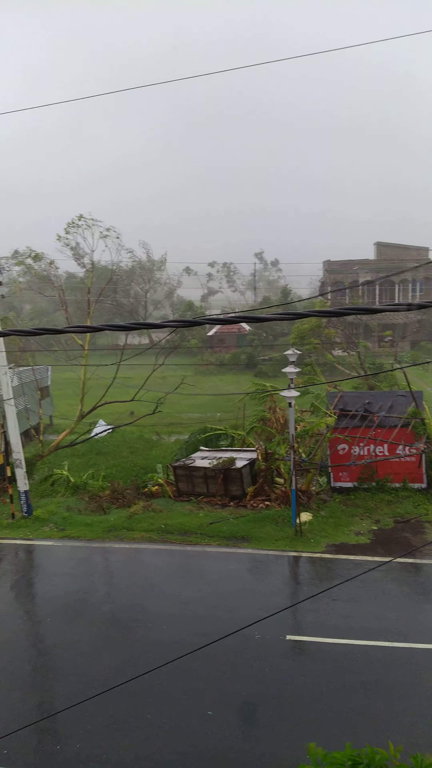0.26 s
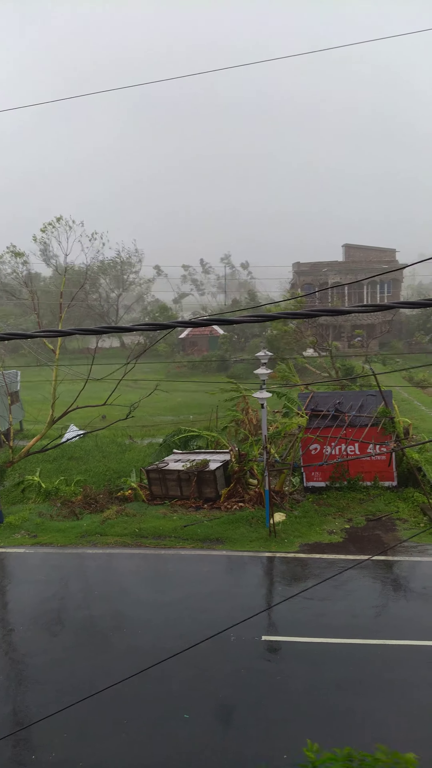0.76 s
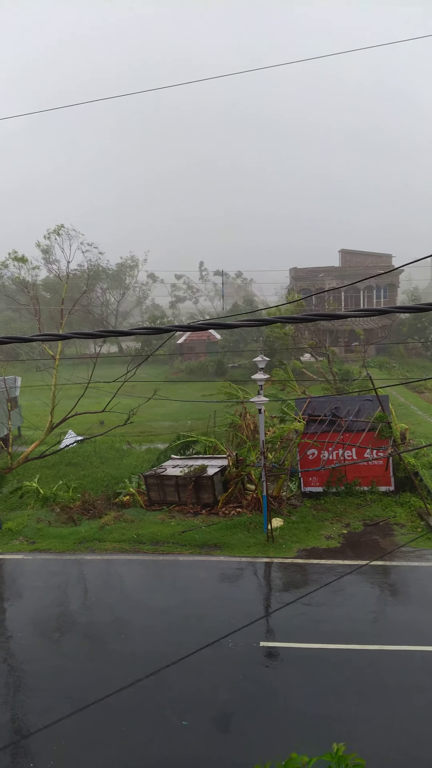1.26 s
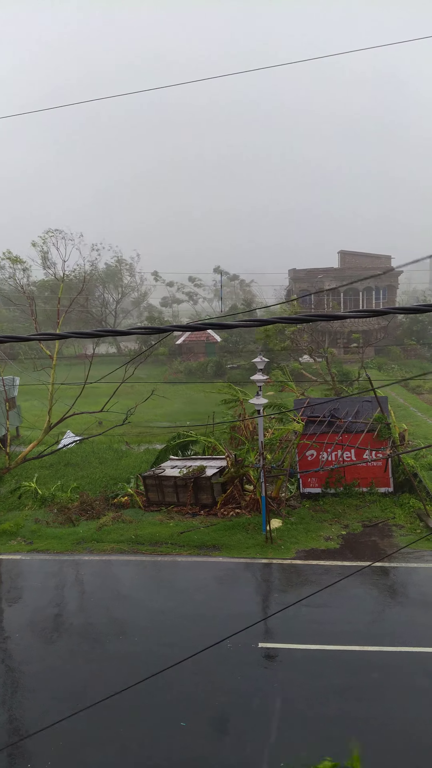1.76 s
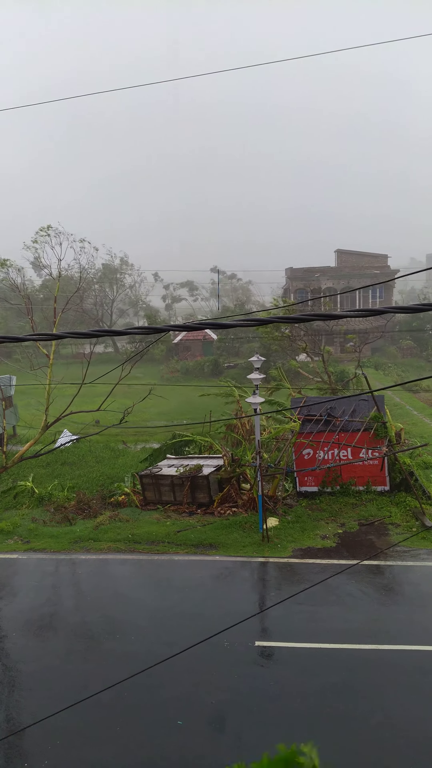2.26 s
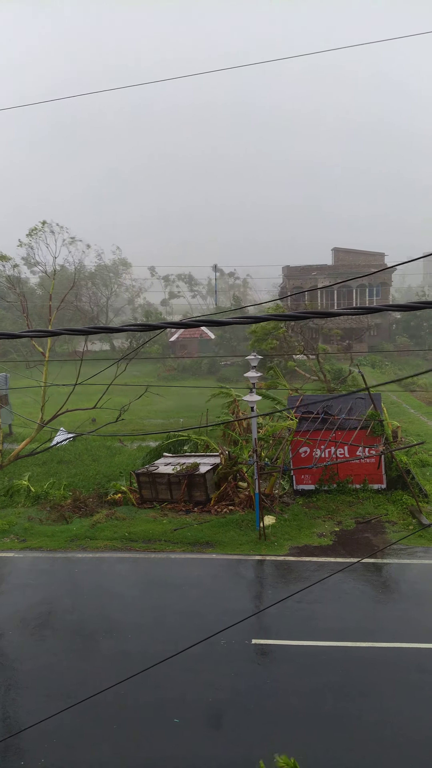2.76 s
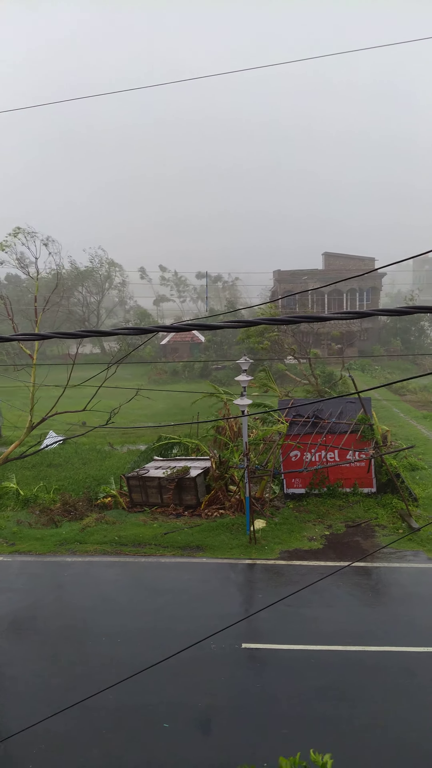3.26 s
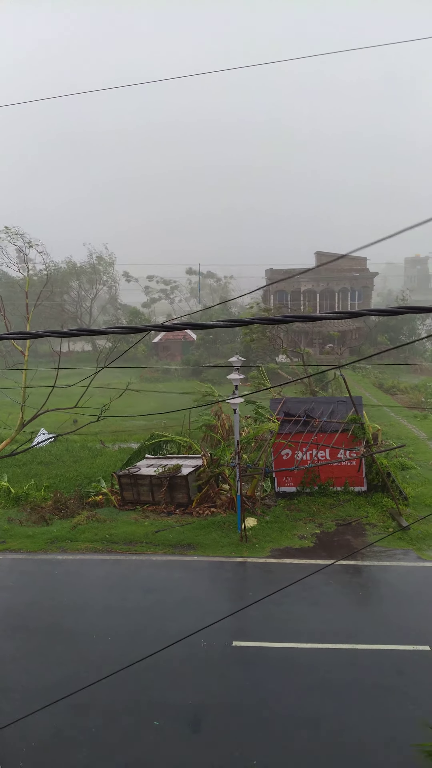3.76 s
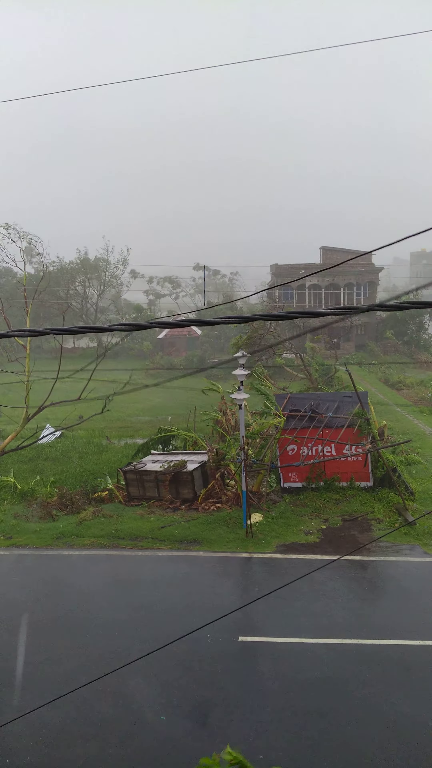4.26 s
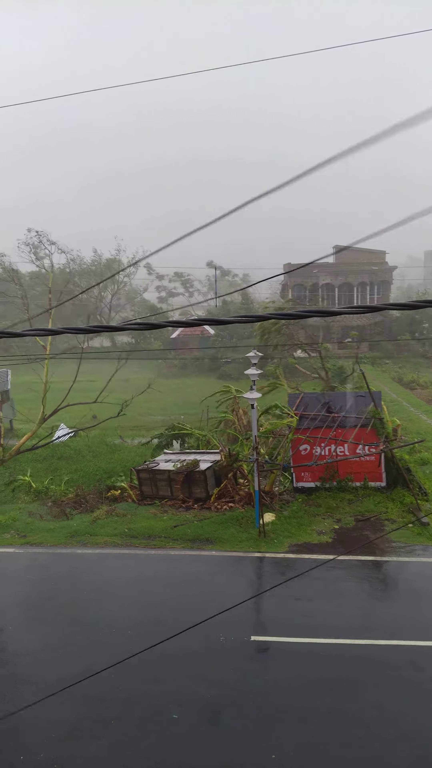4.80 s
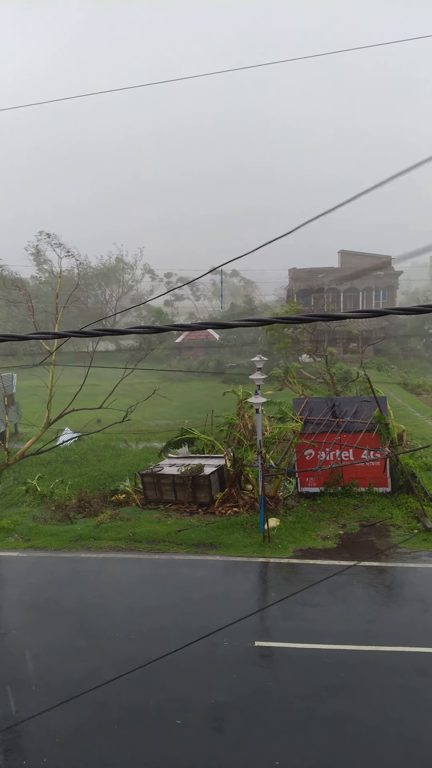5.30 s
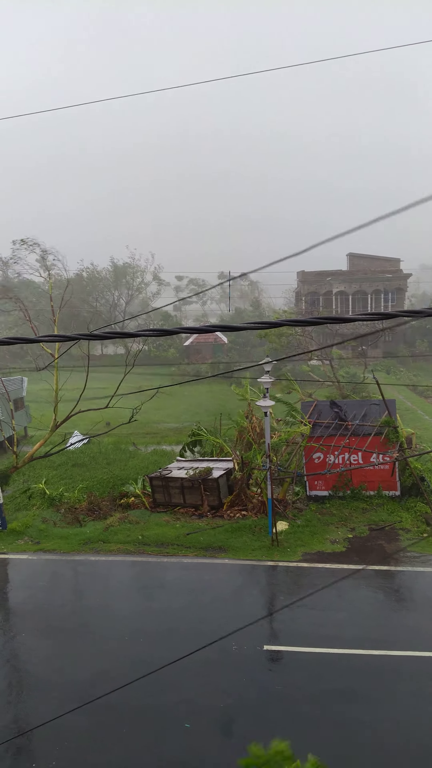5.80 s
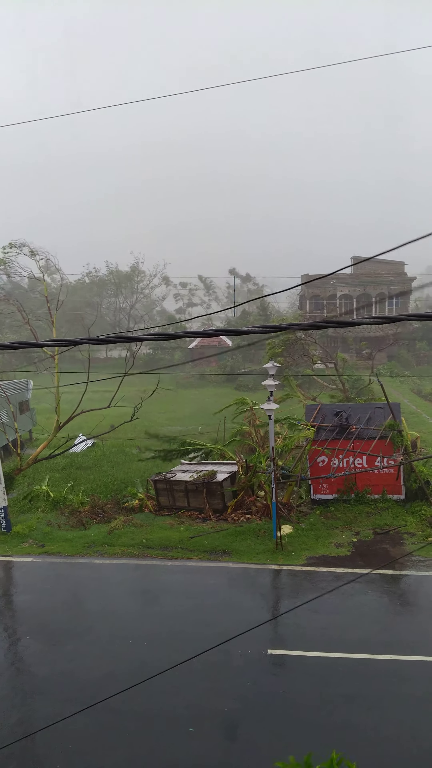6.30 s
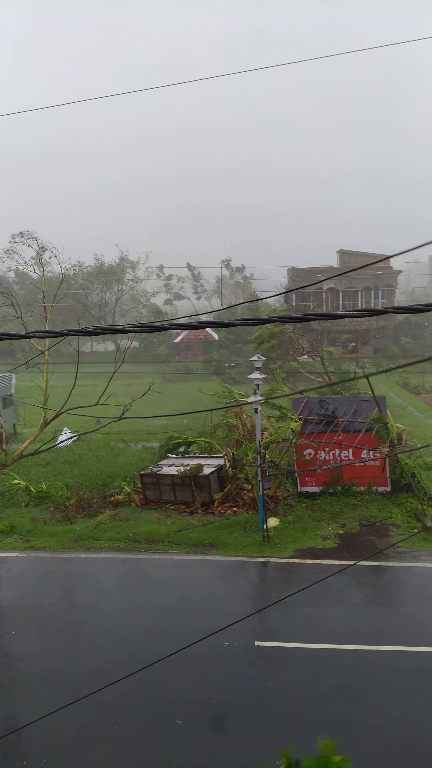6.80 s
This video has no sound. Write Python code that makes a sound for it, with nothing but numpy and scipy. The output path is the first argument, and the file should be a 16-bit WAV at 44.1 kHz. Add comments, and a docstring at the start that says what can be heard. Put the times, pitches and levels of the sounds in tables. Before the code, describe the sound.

Strong storm wind buffets the microphone in two long, crackling gusts, with distant trees roaring and faint rain in the lull between.

```python
"""Cyclone gusts buffet one small microphone, out by a wet road and fields.
Two long gusts hit the port: faster air is brighter, crackles, and makes the gain control duck the storm.
In the lull single eddies thump on the port and a squall flings spray into the leaves.
Far off, one storm strength drives the roar of the trees and the hiss of the rain.
Wires moan overhead, and near the end a loose panel knocks twice."""
import sys
import numpy as np
from scipy import signal
from scipy.fft import rfft, irfft, next_fast_len
from scipy.io import wavfile
from scipy.ndimage import uniform_filter1d, minimum_filter1d, map_coordinates

SR = 44100
rng = np.random.default_rng(int(sys.argv[2]) if len(sys.argv) > 2 else 0)


def to_wav(s):
    """Save 16-bit WAV."""
    ch = np.atleast_2d(s).T  # columns
    pcm = np.round(np.clip(ch, -1, 1) * 32767)  # PCM
    wavfile.write(sys.argv[1], SR, pcm.astype(np.int16))


N = 310904
TIME_S = np.arange(N) / SR


def amp(db):
    """Decibels to gain."""
    return 10 ** (np.asarray(db) / 20)


def unit(x):
    """x at rms 1."""
    return x / np.sqrt(np.mean(x ** 2) + 1e-20)


def curve(rows):
    """(time_s, value) points joined into one value per sample."""
    return np.interp(TIME_S, *np.transpose(rows))


def wobble(knots_per_s):
    """A smooth random curve."""
    knots = rng.standard_normal(int(N * knots_per_s / SR) + 4)
    return map_coordinates(knots, [TIME_S * knots_per_s])


def filtered(x, response):
    """x times a response of frequency."""
    size = next_fast_len(N + SR // 2)
    return irfft(rfft(x, size) * response(np.fft.rfftfreq(size, 1 / SR)), size)[:N]


def low_cut(hz, corner_hz):
    """Response that falls 12 dB an octave below the corner."""
    return hz ** 2 / np.hypot(hz ** 2, corner_hz ** 2)


def coloured(x, spectrum):
    """x shaped by (freq_hz, level_db) points, at rms 1."""
    freq_hz, level_db = np.transpose(spectrum)
    return unit(filtered(x, lambda hz: amp(np.interp(np.log(hz + 1), np.log(freq_hz), level_db))))


def rush(spectrum, patchy_db):
    """Noise of rms 1 with patches of random gain in time and frequency."""
    frames = signal.stft(rng.standard_normal(N), nperseg=512)[2]
    patches = uniform_filter1d(rng.standard_normal(frames.shape), size=5, axis=0)
    patches = unit(uniform_filter1d(patches, size=14, axis=1))
    noise = signal.istft(frames * amp(patchy_db * patches), nperseg=512)[1][:N]
    return coloured(noise, spectrum)


# Storm across the fields, relative to the lull: time_s, strength_db
STORM_STRENGTH = [(0, -0.5), (1.3, 1.5), (2.12, -4), (2.18, 2), (2.62, -2.2), (2.73, 2), (3.5, 0.5),
                  (3.72, 5.5), (4.1, 6.5), (5.35, 5), (5.65, 3), (6.02, 6), (6.3, 3), (6.68, -0.5),
                  (7.05, 3.5)]

def storm(squall_at_s=3.625, squall_db=8.5, rise_s=.012, fall_s=.048, flurry_db=.42):
    """Strength of the storm in dB: slow swells, small flurries and one sharp squall."""
    age = TIME_S - squall_at_s
    squall = np.exp(-.5 * (age / np.where(age < 0, rise_s, fall_s)) ** 2)
    return curve(STORM_STRENGTH) + squall_db * squall + flurry_db * wobble(20)


# Wind in the leaves, far off: freq_hz, level_db
LEAF_SPECTRUM = [(20, -44), (48, -29), (80, -2), (130, 2), (250, -0.5), (540, -1), (700, -3.5), (880, -3),
                 (1400, 1), (1850, -4), (2200, -3), (2650, -10.5), (3300, -9.5), (5000, -25), (12000, -41)]

def trees(storm_db, lull_db=-29.5, growth=.65, sway_db=.5):
    """Distant trees roar louder as the storm grows."""
    level_db = lull_db + growth * storm_db + sway_db * wobble(8.2)
    return amp(level_db) * rush(LEAF_SPECTRUM, patchy_db=1.2)


# Spray over the road and fields: freq_hz, level_db
SPRAY_SPECTRUM = [(2650, -9.5), (4500, -8), (4920, -12.5), (6320, -11), (7280, -5.5), (7710, -3),
                  (8340, -1), (8740, 2), (9260, -2), (11600, -18), (13200, -21.5), (15100, -19),
                  (15700, -24)]

def rain(storm_db, lull_db=-45.5, drops_per_s=900, drops_db=-8):
    """Driven spray hisses with the storm; drops nearer the microphone tick in it."""
    drops = (rng.random(N) < drops_per_s / SR) * rng.standard_normal(N)
    ticks = amp(drops_db) * coloured(drops, SPRAY_SPECTRUM)
    hiss = rush(SPRAY_SPECTRUM, patchy_db=.7)
    return amp(lull_db + storm_db) * (hiss + ticks)


# Swell of the wires overhead: time_s, level_db
WIRE_LEVELS = [(0, -48), (2.2, -43.5), (2.8, -38.5), (3.5, -46), (3.82, -34.5), (6.3, -40), (6.7, -36.5),
               (7.05, -31)]
# Their moan: freq_hz, level_db
MOAN_SPECTRUM = [(300, -41), (580, -18), (690, -0.5), (780, -3.5), (880, -28), (1600, -55), (5000, -100)]

def wires(waver_db=1.0):
    """The overhead wires shed a low, wavering moan."""
    return amp(curve(WIRE_LEVELS) + waver_db * wobble(15)) * rush(MOAN_SPECTRUM, patchy_db=.5)


# Knocks of a loose panel: start_s, level_db, t60_s
PANEL_KNOCKS = [(6.908, -24.5, .14), (6.994, -13.5, .035)]
# Its resonances: pitch_hz, width_hz, level_db
PANEL_MODES = [(720, 300, 0), (1080, 300, -5), (1860, 450, -7)]

def loose_panel(attack_s=.001, top_hz=2600):
    """Each knock rattles the panel briefly in a few broad resonances."""
    def body(hz):
        modes = 0
        for k, (pitch_hz, width_hz, level_db) in enumerate(PANEL_MODES):
            damping = 1j * hz * width_hz
            modes += (-1) ** k * amp(level_db) * damping / (pitch_hz ** 2 - hz ** 2 + damping)
        return modes / (1 + (hz / top_hz) ** 4)

    envelope = np.zeros(N)
    for start_s, level_db, t60_s in PANEL_KNOCKS:
        age = np.maximum(TIME_S - start_s, 0)
        envelope += amp(level_db - 60 * age / t60_s) * (1 - np.exp(-age / attack_s))
    return envelope * unit(filtered(rng.standard_normal(N), body))


def swirl(spectrum):
    """Noise of rms 1 whose pressure swings fairly evenly, as within one eddy."""
    analytic = signal.hilbert(rush(spectrum, patchy_db=7.0))
    return unit(analytic.real / (np.abs(analytic) + .6))


# Single eddies right on the microphone: centre_s, level_db, half_length_s
EDDY_HITS = [(0.234, 0, 0.001), (1.309, -14, 0.004), (2.173, -13, 0.0056), (2.194, -17.5, 0.0091),
             (2.243, -24, 0.011), (2.543, -22, 0.0087), (2.72, -25, 0.01), (3.574, -18.5, 0.015),
             (3.7, -11.5, 0.016), (3.761, -6, 0.017), (3.913, -15.5, 0.018), (4.02, -18.5, 0.022),
             (4.103, -16.5, 0.012), (4.226, -13, 0.011), (4.232, -3, 0.0012), (5.887, -7.5, .0014),
             (6.545, -28, 0.013)]
# Their thump: freq_hz, level_db
THUMP_SPECTRUM = [(20, -26), (50, -18), (85, 4), (130, 5.5), (200, -2.5), (320, -10), (600, -26),
                  (1200, -52), (4000, -69)]
# Slap of medium eddies, here and in the gusts: freq_hz, level_db
MEDIUM_EDDY_SPECTRUM = [(100, -18), (230, -9), (360, -0.5), (520, 1), (720, -0.5), (1000, -5), (1400, -14),
                        (2200, -34.5), (4000, -76), (9000, -93)]

def single_eddies(even_mix_s=.0032, slap_power=1.9):
    """Single eddies hit the port with a deep thump; shorter ones slap more."""
    thump, slap = swirl(THUMP_SPECTRUM), swirl(MEDIUM_EDDY_SPECTRUM)
    pressure = np.zeros(N)
    for centre_s, level_db, half_length_s in EDDY_HITS:
        brightness = (even_mix_s / half_length_s) ** slap_power
        envelope = amp(level_db) * np.exp(-.5 * ((TIME_S - centre_s) / half_length_s) ** 2)
        pressure += envelope * (thump + brightness * slap) / np.hypot(1, brightness)
    return filtered(pressure, lambda hz: low_cut(hz, corner_hz=60))


# Sharpest overloads at the microphone: time_s, relative_peak_db
OVERLOADS = [(0.3561, -29), (0.4803, -32), (0.5147, -27), (0.9193, -27), (4.6454, -24), (4.7446, -21),
             (4.7684, -28), (4.8189, -25), (4.9896, -24), (5.0284, -30), (5.1357, -31), (5.1654, -28),
             (5.1991, -21), (5.6994, -35)]
# One crack: freq_hz, level_db
CRACK_SPECTRUM = [(1000, -20), (2500, -2), (4500, 0), (7300, -10), (9000, -24), (15000, -38)]

def cracks(boost_db=12.0):
    """The hardest pressure jumps overload the port with single sharp cracks."""
    jumps = np.zeros(N)
    for time_s, relative_peak_db in OVERLOADS:
        jumps[int(time_s * SR)] += amp(relative_peak_db + boost_db)
    impulse = np.arange(N) == SR
    crack = coloured(impulse, CRACK_SPECTRUM)[SR - 256:SR + 257]
    return signal.fftconvolve(jumps, crack / np.abs(crack).max(), mode="same")


# Spits at the microphone port: freq_hz, level_db
CRACKLE_SPECTRUM = [(800, -26), (1900, 7.5), (2700, 3.5), (3400, -5.5), (4500, -12), (7000, -24.5),
                    (9000, -31), (15000, -39)]

def crackle(force, spits_per_s=750, scatter_db=4):
    """Hard air overloads the port in spits, more often as the force (about 1 at the crest) grows."""
    sizes = rng.choice([-1, 1], N) * amp(scatter_db * np.clip(rng.standard_normal(N), -2, 2))
    spits = (rng.random(N) < force * spits_per_s / SR) * sizes
    return coloured(spits, CRACKLE_SPECTRUM) * np.sqrt(np.mean(force))


def eddy_gain(speed, full_db, knee, power):
    """Eddies of one size grow with a power of the air speed, then level off past the knee."""
    return amp(full_db) / np.hypot(1, (knee / speed) ** power)


# Air speed right at the microphone: time_s, share_of_top_speed
FIRST_GUST_SPEED = [(0, 0.74), (.24, 0.57), (.34, 0.83), (.54, 0.9), (.56, 0.69), (.68, 0.68), (.75, .63),
                    (.88, 0.77), (1.13, 0.8), (1.19, 0.59), (1.3, 0.42), (1.62, 0.25)]
SECOND_GUST_SPEED = [(3.42, 0.11), (3.63, 0.33), (4.19, 0.33), (4.23, 0.56), (4.37, .74), (4.62, 0.99),
                     (4.8, 0.99), (5.1, 0.84), (5.21, 0.87), (5.3, .75), (5.55, .69), (5.68, 0.81),
                     (5.795, 0.8), (5.82, 0.64), (6.07, 0.42), (6.14, 0.25)]
# Rumble of large eddies and rasp of small ones: freq_hz, level_db
LARGE_EDDY_SPECTRUM = [(20, -21), (48, -31), (70, -14), (110, -2.5), (200, 0), (290, -2), (420, -10),
                       (800, -26.5), (2000, -62), (5000, -100)]
SMALL_EDDY_SPECTRUM = [(300, -38), (700, -28), (1050, 2.5), (1400, 0.5), (1900, 0), (2400, -8.5),
                       (3200, -21.5), (4500, -36.5), (7000, -66), (14000, -68)]

def gusts(surge_db=1, burst_db=2, tear_db=2, crackle_db=-11):
    """Turbulence on the port: the faster the air, the more of it breaks into small, bright eddies."""
    speed = curve(FIRST_GUST_SPEED + SECOND_GUST_SPEED)
    large_gain = eddy_gain(speed, full_db=-9.5, knee=.7, power=3.16)
    medium_gain = eddy_gain(speed, full_db=-1.8, knee=.85, power=4.08)
    small_gain = eddy_gain(speed, full_db=-1.5, knee=1.069, power=5.53)
    surge = amp(surge_db * wobble(28))  # all sizes of eddy surge together
    large = surge * coloured(rng.standard_normal(N), LARGE_EDDY_SPECTRUM)
    medium = surge * rush(MEDIUM_EDDY_SPECTRUM, patchy_db=1.25)
    # small eddies tear off in short bursts, and the spits cluster in them
    tearing = unit(surge * amp(burst_db * wobble(18) + tear_db * wobble(260)))
    small = tearing * rush(SMALL_EDDY_SPECTRUM, patchy_db=.56)
    spits = amp(crackle_db) * crackle(force=small_gain / small_gain.max() * tearing ** 2)
    return large_gain * large + medium_gain * medium + small_gain * (small + spits)


def scene():
    """Wind on the microphone itself, with the storm over the fields behind it, in mono."""
    storm_db = storm()
    on_port = gusts() + cracks() + single_eddies()
    background = trees(storm_db) + wires() + rain(storm_db) + loose_panel()
    return (on_port + background)[None]


def gain_control(x, threshold_db=-13.0, squeeze=.58, window_s=.05):
    """Turns everything down by a share of the dB by which the running level passes the threshold."""
    power = np.abs(uniform_filter1d(x ** 2, size=int(window_s * SR))) / amp(threshold_db) ** 2
    return x / np.sqrt(np.hypot(1, power)) ** squeeze


def limiter(x, ceiling=.89, knee=10):
    """Softly holds down peaks, keeping the gain low for a moment around each."""
    needed_gain = (1 + np.abs(x / ceiling) ** knee) ** (-1 / knee)
    held_gain = minimum_filter1d(needed_gain, size=401, origin=170)
    return x * uniform_filter1d(held_gain, size=61)


def record(dry, low_cut_hz=64, notch_hz=7880, notch_width_hz=90, top_hz=15750, fade_s=.001):
    """The small microphone cuts deep bass, top treble and one narrow notch, then ducks and limits."""
    notch = lambda hz: 1 - .9 * np.exp(-((hz - notch_hz) / notch_width_hz) ** 2)
    picked_up = filtered(dry[0], lambda hz: low_cut(hz, low_cut_hz) * notch(hz))
    limited = limiter(gain_control(picked_up))
    fade_in = np.minimum(TIME_S / fade_s, 1)
    return filtered(limited * fade_in, lambda hz: hz < top_hz)[None]


dry = scene()
out = record(dry)
to_wav(out)
```